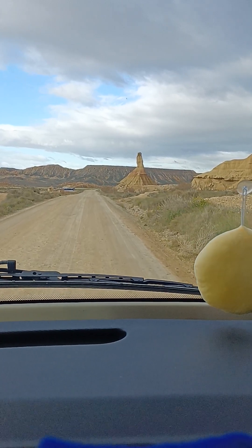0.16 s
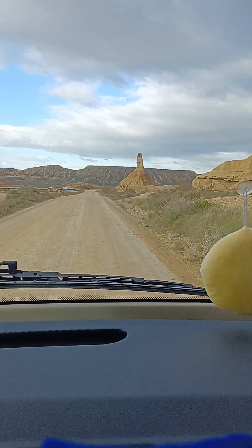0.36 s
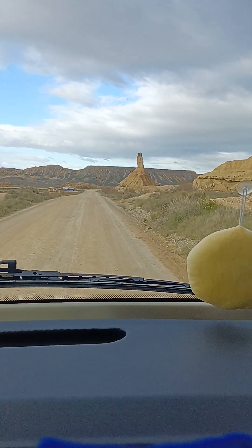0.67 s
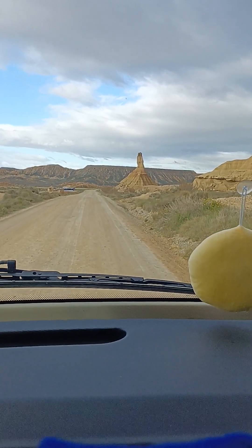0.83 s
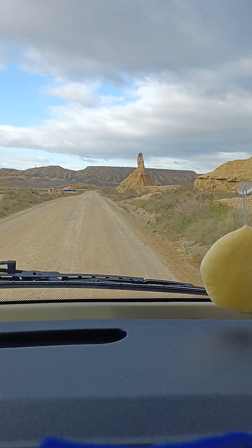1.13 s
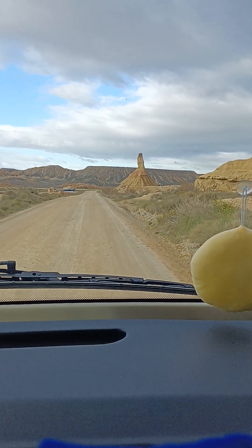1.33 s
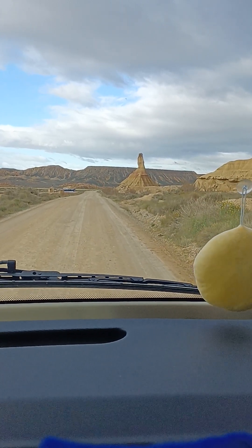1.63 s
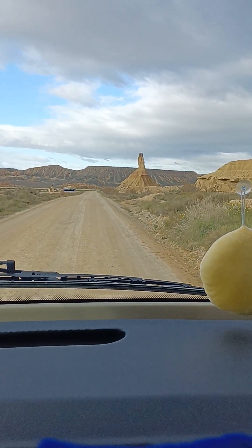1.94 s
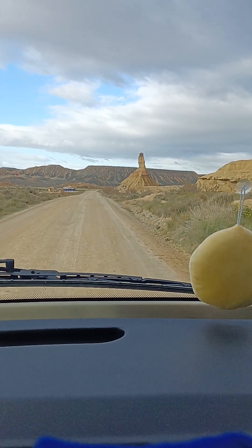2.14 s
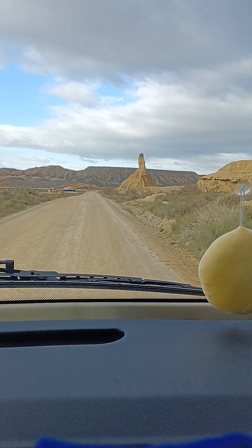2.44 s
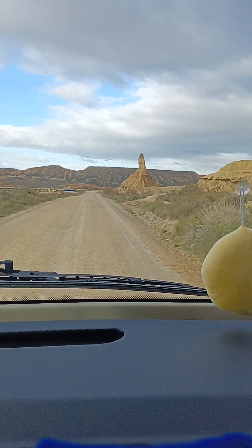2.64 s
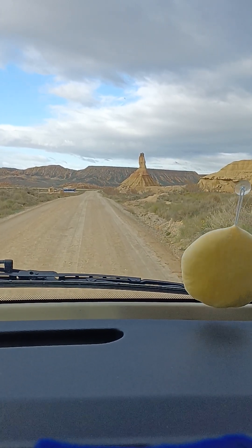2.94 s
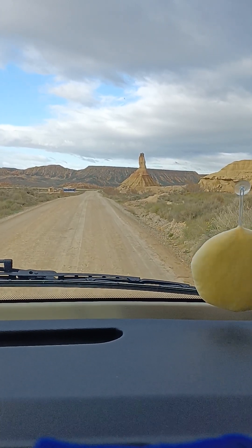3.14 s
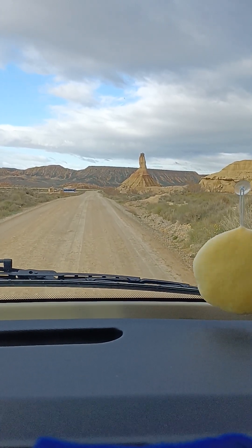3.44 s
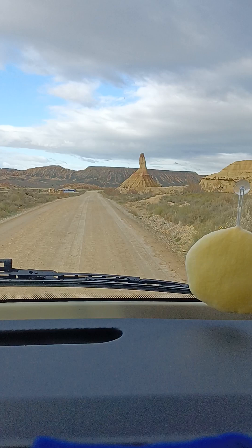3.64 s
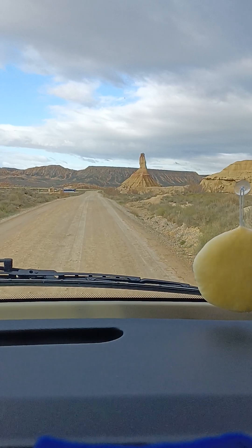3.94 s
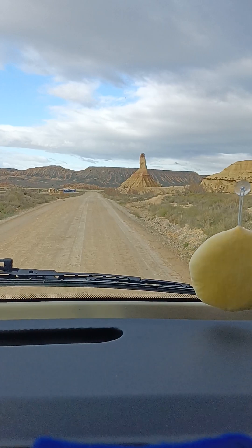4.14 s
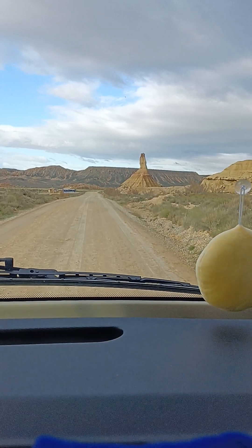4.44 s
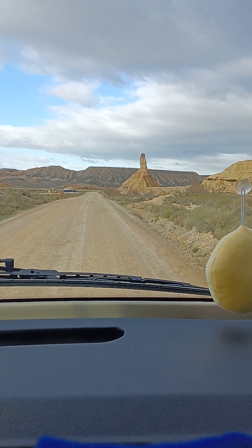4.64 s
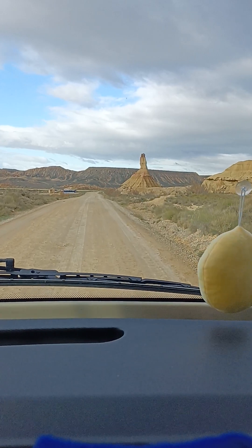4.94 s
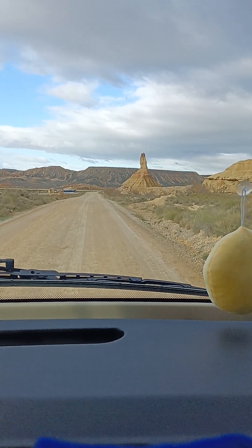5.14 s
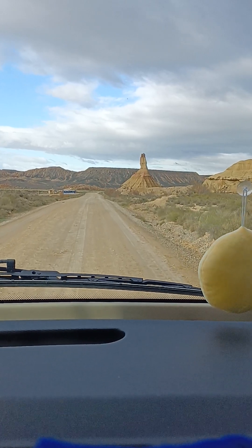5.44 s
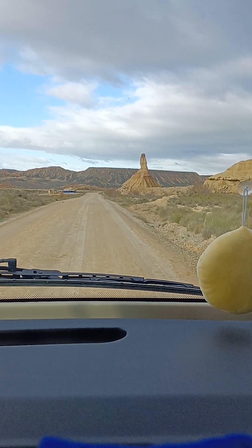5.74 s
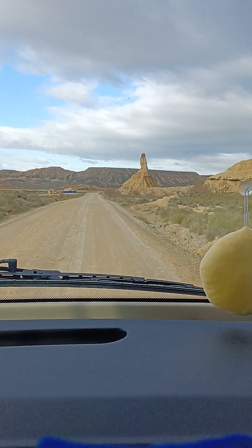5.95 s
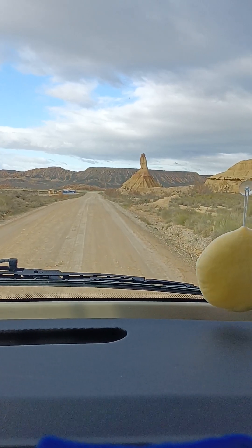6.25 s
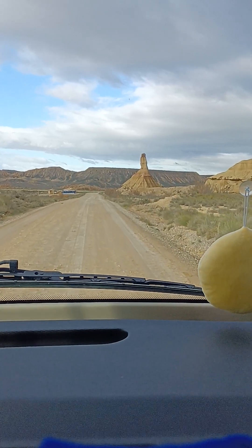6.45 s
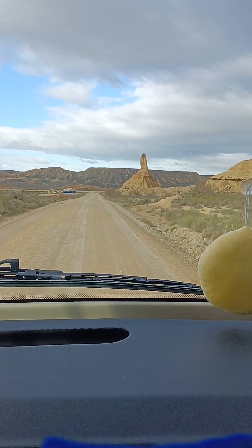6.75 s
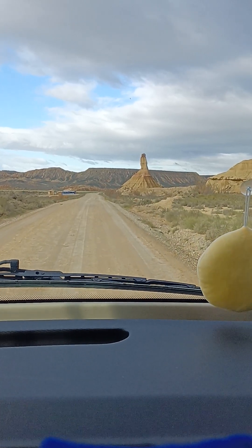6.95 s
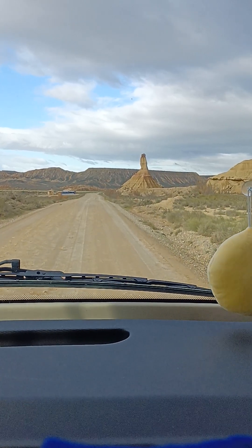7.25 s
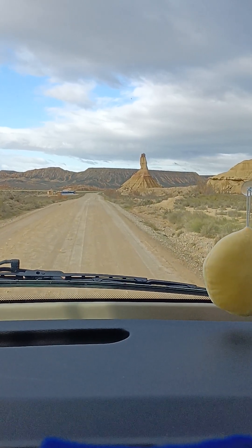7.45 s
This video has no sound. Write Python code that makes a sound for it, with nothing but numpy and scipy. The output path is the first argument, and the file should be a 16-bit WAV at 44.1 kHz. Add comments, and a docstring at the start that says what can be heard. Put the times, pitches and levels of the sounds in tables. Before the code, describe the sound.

Heard from the front seat of a small car on a gravel track. Bumpy low rumble, tyre roar and gritty crunching lie over a humming engine. Stones knock hollowly on the floor and plastic trim clacks and ticks thickly for three seconds; then it thins, with occasional pops and knocks, before roar and engine rise slightly at the end.

```python
"""A small car rolls slowly along a gravel track, heard from the front seat.
From the start, shaped noise makes tyre rumble and roar over crunching resonant stones; harmonics hum as engine.
Knocks, trim clacks and runs of ticks, all modes or noise bursts that die away, crowd the first three seconds.
Pebbles pop as sagging tones and stones skid as narrow noise from the first second on; later the engine note
sinks, the roar eases and two stones strike the wheel arch; at the end roar and engine note rise again."""
import sys
import numpy as np
from scipy import signal
from scipy.fft import rfft, irfft, next_fast_len
from scipy.io import wavfile
from scipy.ndimage import uniform_filter1d

SR = 44100
rng = np.random.default_rng(int(sys.argv[2]) if len(sys.argv) > 2 else 0)


def unload_wav(signal):
    """Save mono or channel-first audio to the path in sys.argv[1] as 16-bit WAV at rate SR, clipped to [-1, 1]."""
    wavfile.write(
        sys.argv[1],
        SR,
        np.round(np.clip(np.atleast_2d(signal).T, -1, 1) * 32767).astype(np.int16),
    )


N = 334719

# spectrum of a stone cracking against the bodywork: frequency_hz, density_db
CRACK_COLOUR = [(400, -0.5), (900, -12.5), (1500, 0.5), (2500, 3.5), (3500, -3), (4500, -15.5), (5500, -12),
                (7500, -30), (8400, -15.5), (9300, -49), (16000, -35)]
# spectrum of the panels and hollows under the car: frequency_hz, density_db
UNDERBODY_COLOUR = [(100, -22), (200, -12), (280, -3), (400, 6), (520, 1), (680, 3.5), (850, -4.5),
                    (1100, -1.5), (1800, -8), (4000, -61)]


def tyres(rumble_db, roar_db):
    """Forced vibration: bumps shake the body; four treads roar, each swelling in its own colour."""
    # spectrum of the shaken body: frequency_hz, density_db
    rumble_colour = [(15, -34), (28, -15), (40, -5.5), (52, 3), (63, -4), (78, 6), (100, 0.5), (122, -12.5),
                     (150, -13), (220, -23), (400, -69)]
    # spectrum of the treads: frequency_hz, density_db
    roar_colour = [(60, -7), (110, 1.5), (160, 4.5), (215, -11), (265, 0), (330, 10.5), (390, 7.5),
                   (460, -9.5), (590, 2.5), (750, -26.5), (1200, -42), (3000, -54)]
    shake = coloured(rng.standard_normal((2, N)), rumble_colour)
    # evened, so that the bumps set its level
    shake = shake / np.sqrt(uniform_filter1d(np.mean(shake ** 2, axis=0), size=2600) + 1e-9)
    treads = np.zeros((2, N))
    for wheel in range(4):
        tread = coloured(rng.standard_normal((2, N)), roar_colour, ripple_db=3, order=110)
        treads += from_db(4.5 * drift(9)) * tread
    rumble = from_db(rumble_db - 3.0 + 2.5 * drift(6.4)) * shake
    return rumble + from_db(roar_db + 4.5) * rms_one(treads)


def body_shake():
    """Power addition: each dip adds a short swell to the steady shaking; level in dB."""
    # steady shaking of the body: time_s, level_db
    steady = [(0, -37.5), (3.08, -37.5), (3.2, -61), (3.5, -35.5), (3.9, -42), (4.15, -43), (4.55, -43.5),
              (4.72, -52), (5.02, -52), (5.15, -42), (6.05, -45), (6.25, -52), (6.72, -64), (6.85, -42.5),
              (7.59, -37.5)]
    # a wheel drops into a dip: middle_s, level_db
    bumps = [(0.165, -31.5), (0.25, -31), (0.408, -30.5), (0.51, -33.5), (0.67, -30.5), (0.87, -31.5),
             (0.99, -34), (1.26, -28.5), (1.44, -39), (1.601, -36), (1.81, -26), (1.978, -38), (2.109, -31),
             (2.501, -29.5), (2.769, -36), (2.94, -40), (3.101, -39), (3.38, -35), (3.54, -42),
             (3.74, -35.0), (4.02, -40), (4.389, -31.5), (4.6, -44), (5.189, -35), (5.35, -35), (5.51, -46),
             (5.71, -37), (5.85, -34.5), (6.089, -38.5), (6.61, -41), (6.97, -36), (7.169, -42),
             (7.28, -41), (7.548, -38)]
    half_width_s = 0.02   # to 1/e of the power
    t = np.arange(N) / SR
    power = from_db(in_time(steady)[0]) ** 2
    for s, db in bumps:
        power = power + from_db(db) ** 2 * np.exp(-np.minimum(((t - s) / half_width_s) ** 2, 20))
    return 10 * np.log10(power)


def surface():
    """Power addition: roar and crunch (dB) rise on loose stones, hold, and decay behind them."""
    # tyres on the packed track: time_s, roar_db, crunch_db
    packed = [(0, -58, -76), (.18, -66, -59.5), (.6, -55.5, -57), (1.1, -49, -54), (2.45, -49.5, -67),
              (2.85, -55, -55.5), (3.08, -57.5, -55.5), (3.6, -55.5, -62), (4.1, -56, -71.5),
              (4.6, -61.5, -72), (5.1, -58.5, -68), (5.5, -57.5, -66), (5.95, -56, -68.5),
              (6.65, -57.5, -69.5), (7.59, -50, -65.5)]
    # the tyres plough through loose stones: start_s, length_s, roar_db, crunch_db
    patches = [(0, 0.041, -41.5, -47.5), (0.263, 0.22, -45.5, -45.5), (0.77, 0.26, -50, -81),
               (1.202, 0.56, -44, -47), (1.846, 0.48, -43, -49), (2.546, 0.23, -43.5, -47),
               (3.32, 0.48, -51.5, -56.5), (4.045, 0.095, -52.5, -84), (4.136, 0.083, -55, -61),
               (4.324, 0.095, -69, -54.5), (4.731, 0.054, -83, -51.5), (5.703, 0.14, -49, -57.5),
               (6.163, 0.089, -51.5, -85), (6.384, 0.099, -60, -51.5), (7.11, 0.08, -46.5, -50),
               (7.466, 0.084, -47, -67)]
    attack_s, release_db_per_s = 0.0077, 221
    t = np.arange(N) / SR
    power = from_db(in_time(packed)) ** 2
    for s, length, *levels_db in patches:
        attack = np.clip((t - s) / attack_s, 0, 1)
        release = from_db(-release_db_per_s * np.clip(t - s - length, 0, 1))
        power = power + np.outer(from_db(levels_db), attack * release) ** 2
    return 10 * np.log10(power)


def gravel(crunch_db, hiss_db):
    """Random impacts: small stones grind together under the treads, over a hiss of grit."""
    # spectrum of the crunch: frequency_hz, density_db
    gravel_colour = [(400, -14), (700, -7), (1000, 6.5), (1500, 7), (2400, 5), (3300, 6.5), (4400, -3.5),
                     (5200, -1), (7000, -7.5), (8000, -29), (9500, -31.5), (16000, -42)]
    grinding = stones(per_s=2200, size_db=4, low_hz=620, high_hz=8000, cycles=40)
    grit = from_db(hiss_db + 4 * drift(24)) * rng.standard_normal((2, N))
    return from_db(crunch_db) * coloured(grinding + grit, gravel_colour)


def underbody(level_db):
    """Overlapping resonances: larger stones tumble under the car in a run of hollow knocks."""
    thinning = 0.27   # they grow scarce on packed ground: extra dB lost per dB of quiet
    knocks = stones(per_s=200, size_db=3, low_hz=380, high_hz=1250, cycles=74)
    thinned_db = level_db - thinning * (level_db.max() - level_db)
    return from_db(thinned_db) * coloured(knocks, UNDERBODY_COLOUR)


def stones(per_s, size_db, low_hz, high_hz, cycles, count=24):
    """Clumped random impacts on two-pole resonators, blurred by the cabin's reverberation; rms 1."""
    blur_t60_s = .05
    born = rng.random(N) < per_s * from_db(4 * drift(25)) / SR   # the drift makes clumps
    spread = from_db(size_db * np.minimum(rng.exponential(1, N), 3))
    sizes = born * spread * rng.standard_normal((2, N))
    dealt = rng.integers(0, count, N)   # which pitch each stone gets
    rings = 0
    for k, hz in enumerate(np.geomspace(low_hz, high_hz, count)):
        r = from_db(-60 * hz / (cycles * SR))   # falls 60 dB in this many cycles
        w = 2 * np.pi * hz / SR
        struck = sizes * (dealt == k) + 1e-18
        rings = rings + signal.lfilter([w, -w], [1, -2 * r * np.cos(w), r * r], struck)
    t = np.arange(SR // 10) / SR
    blur = rng.standard_normal((2, len(t))) * from_db(-60 * t / blur_t60_s)
    return rms_one(signal.fftconvolve(rings, blur, axes=1)[:, :N])


def floor_knocks():
    """Modal ringing: a thrown stone cracks and strikes again; the floor pan rings, its panels shudder."""
    # stones knocking on the floor: time_s, thud_db, crack_db
    knocks = np.array([(0.32, -24.5, -51), (0.359, -34, -39.5), (0.4169, -28, -52), (0.74, -15.5, -37.5),
                       (0.849, -23.5, -46), (1.259, -19.5, -31), (1.332, -32, -59), (1.226, -22.5, -43),
                       (1.47, -41, -37.5), (1.675, -19, -33.5), (2.03, -29, -48), (2.283, -27, -38),
                       (1.874, -16.5, -30), (2.186, -13, -31.5), (2.614, -15.5, -29.5), (2.65, -42, -31),
                       (3.379, -25, -35), (3.46, -26.5, -40.5), (4.384, -53, -44.5), (5.749, -29, -39.5),
                       (6.379, -17, -33.5), (6.44, -28.5, -45), (7.136, -18, -35.5), (7.231, -25, -36.5),
                       (7.511, -30.5, -43)])
    # modes of the floor pan: frequency_hz, level_db, t60_s
    floor_modes = [(344.4, -4, 0.11), (363.3, -16, 0.18), (411, -8.5, 0.11), (567, -22.5, 0.036),
                   (619, -19, 0.093), (665, -23, 0.024), (803, -21.5, 0.21), (960, -9.5, 0.018)]
    early_s, bounce_s, thud_db = .003, .011, -4.5
    shudder_db, shudder_t60_s = -20, 0.1
    t = np.arange(SR // 4) / SR
    thuds, shudder = np.zeros(N), np.zeros(N)
    for s, db, _ in knocks:
        for late_s in (-early_s, bounce_s):
            ring = np.zeros(len(t))
            for hz, mode_db, t60 in floor_modes:
                strength_db, detune, turn = rng.standard_normal(3)
                wave = np.sin(2 * np.pi * (hz * (1 + 0.0345 * detune) * t + turn))
                ring += from_db(mode_db + strength_db - 60 * t / t60) * wave
            add(thuds, s + late_s, from_db(db + thud_db) * ring * (1 - np.exp(-t / 0.0015)))
        fall_db = 60 * np.maximum(t - bounce_s, 0) / shudder_t60_s
        envelope = from_db(db + shudder_db - fall_db) * (1 - np.exp(-t / 0.0017))
        add(shudder, s - early_s, envelope)
    cracks = strikes(knocks[:, [0, 2]], CRACK_COLOUR, body_t60=0.055, tail_t60=0.11, tail_db=1.0,
                     lead_s=0.0093, lead_db=2.5, rebound_s=0.024, rebound_db=-2.5, late_s=0)
    panels = shudder * coloured(rng.standard_normal((2, N)), UNDERBODY_COLOUR)
    return thuds * panned(2.8) + panels + from_db(3.5) * cracks


def rattles():
    """Impact excitation: ticks, clacks with a ringing panel, stones on the wheel arch, a faint tinkle."""
    # loose fittings tick, mostly in runs about 50 ms apart: time_s, level_db, brightness_db
    tick_events = [(.0412, -35.5, 2.5), (.0805, -40, 1.5), (.2634, -37, 0.5), (.3212, -31.5, 5),
                   (.4196, -27, 2.5), (.4692, -37, 2), (.5831, -41.5, 7), (.6787, -46, 0),
                   (.7158, -34, -8.5), (.845, -37, -0.5), (1.068, -42.5, -5), (1.2229, -29.5, 3),
                   (1.3182, -32, 1), (1.3758, -32, -2), (1.4234, -37.5, -8), (1.5198, -32.5, -0.5),
                   (1.5725, -33.5, -2), (1.623, -36, 3), (1.6747, -31, 4.5), (1.7242, -33, 1),
                   (1.8483, -41.5, 13), (1.8961, -37, -8), (2.091, -44, 0), (2.148, -31.5, 1),
                   (2.2033, -26.5, -1.5), (2.2481, -26, 4), (2.3392, -36.5, 0), (2.3841, -44, -1),
                   (2.429, -34.5, -2.5), (2.5664, -26.5, 0.5), (2.7111, -36, 0), (2.7728, -32, 2),
                   (2.9808, -37, 1), (3.025, -31.5, 2), (3.072, -32, 1.5), (3.1287, -41.5, -2),
                   (3.1938, -32, 0), (3.3173, -45, 4), (3.3824, -33.5, 3.5), (3.5929, -33, 1.5),
                   (3.6838, -29, -0.5), (3.731, -30.5, 1), (3.8983, -51, 2), (3.9512, -32, 1),
                   (4.0044, -33, -0.5), (4.1675, -32.5, 3.5), (4.2162, -32.5, 1), (4.2654, -37.5, 2),
                   (4.393, -42, -3), (4.5005, -47, -5), (4.5547, -47.5, -0.5), (4.7366, -40, -8),
                   (5.0614, -52, 9), (5.2358, -45, 2.5), (5.2851, -36.5, 0), (5.4345, -36, 3.5),
                   (5.5223, -44, 1), (5.5732, -40.5, 0.5), (5.6258, -41.5, 1), (5.7622, -33, 2),
                   (5.8111, -33, 1.5), (5.867, -37, 1.5), (6.0872, -39, 2.5), (6.1452, -47, 2),
                   (6.2012, -43, 9), (6.7122, -40.5, 1), (6.7599, -39, -3), (6.807, -38.5, -1.5),
                   (7.031, -52, 9), (7.0833, -44.5, -0.5), (7.139, -32, -1.5), (7.4567, -39.5, 0),
                   (7.5156, -34.5, -3)]
    # spectrum of a tick: frequency_hz, density_db
    tick_colour = [(400, -12), (1000, -18.5), (1800, -16), (2300, -2), (3300, -0.5), (4500, -8),
                   (5000, -1.5), (6000, -9.5), (7200, -7.5), (7900, -21.5), (8600, -17.5), (9500, -31),
                   (12000, -23), (16000, -35.5)]
    # plastic trim clacks: time_s, level_db
    clack_events = [(0.0034, -30), (0.316, -31), (0.624, -34.5), (0.7139, -22.5), (0.8404, -30),
                    (1.0675, -37.5), (1.2189, -24.5), (1.258, -20.5), (1.4672, -23.5), (1.6216, -29.5),
                    (1.9637, -25.5), (2.0302, -20.5), (2.2453, -21.5), (2.2824, -27), (2.7101, -25.5),
                    (4.006, -29), (4.333, -34), (5.7463, -27), (6.1434, -27), (6.545, -22.5), (7.1786, -31),
                    (7.4966, -22.5)]
    # spectrum of a clack: frequency_hz, density_db
    clack_colour = [(400, -5.5), (1050, -31.5), (1400, -4.5), (1850, -5), (2200, 9.5), (2800, 2),
                    (3500, -3), (4400, -14), (5200, -17), (6500, -22.5), (8300, -27.5), (9300, -51),
                    (16000, -39)]
    # modes of the dashboard panel behind the clacks: frequency_hz, level_db, t60_s
    panel_modes = [(1330, -8, 0.07), (1490, -17.5, 0.045), (1910, -15.5, 0.17), (2120, 1.5, 0.039),
                   (2350, -9, 0.015), (2573, -13, 0.079), (2720, -7.5, 0.078), (3150, -13, 0.058)]
    # stones striking the left wheel arch: time_s, level_db
    arch_hits = [(4.7372, -34.5), (5.3678, -34)]
    # a small piece of metal tinkles when shaken: time_s, level_db
    tinkle_events = [(.3601, -49), (1.4222, -44), (2.1844, -47), (2.6145, -40)]
    # modes of the metal: frequency_hz, level_db, t60_s
    tinkle_modes = [(8280, -2.5, 0.058), (8100, -6, 0.053)]
    ticks = strikes(tick_events, tick_colour, body_t60=0.019, tail_t60=0.14, tail_db=-6.0,
                    lead_s=.007, lead_db=7.5, rebound_s=0.0034, rebound_db=-8.5, late_s=0)
    clacks = strikes(clack_events, clack_colour, body_t60=0.011, tail_t60=0.11, tail_db=-9.0,
                     lead_s=0.0083, lead_db=6.5, rebound_s=.008, rebound_db=-1.5, late_s=0.000965)
    arch = strikes(arch_hits, CRACK_COLOUR, body_t60=0.055, tail_t60=0.22, tail_db=-11.5,
                   lead_s=0.0027, lead_db=3.0, rebound_s=0.007, rebound_db=-31.0, late_s=0)
    panel = ringing(clack_events, panel_modes, rise_s=0.00097, spread_db=-2.0)
    tinkle = ringing(tinkle_events, tinkle_modes, rise_s=0.002, spread_db=3)
    trim = from_db(-3.5) * clacks + from_db(-2) * panel * panned(2.7)
    return from_db(1) * with_echo(ticks) + trim + arch * panned(5.4) + from_db(4.5) * tinkle


def strikes(events, colour, body_t60, tail_t60, tail_db, lead_s, lead_db, rebound_s, rebound_db,
            late_s, size=7200):
    """Convolution of contacts with a response: blows share a ring, but each favours other modes."""
    out = np.zeros((2, N))
    shared = rng.standard_normal((2, size))
    hz, colour_db = np.transpose(colour)
    treble = np.clip(np.log2(hz / 4700), -.4, 1)   # a third event column tilts the blow brighter
    for s, db, *brightness_db in events:
        own_colour = np.c_[hz, colour_db + sum(brightness_db) * treble]
        ring = coloured(shared + rng.standard_normal((2, size)), own_colour, ripple_db=1.8)
        touches = contacts(lead_s, lead_db, rebound_s, rebound_db)
        sound = signal.fftconvolve(response(ring, body_t60, tail_t60, tail_db), touches[None])
        peak = np.sqrt(uniform_filter1d(np.mean(sound ** 2, axis=0), size=180).max())
        # the hard contact falls late_s after the listed time
        add(out, s + late_s - lead_s, from_db(db) * sound / peak)
    return out


def contacts(lead_s, lead_db, rebound_s, rebound_db, size=2400):
    """Impulsive excitation: a short soft swell of noise, a hard contact, gritty spray and rebounds."""
    spray_db, spray_t60_s = -2.5, 0.024   # level against the hard contact
    n = np.arange(size)
    main = min(round(lead_s * SR) + 2, size // 2)
    swell = dulled(rng.standard_normal(size) * (n < main) * (n / main) ** 2, hz=12100)
    out = from_db(lead_db) * swell / np.linalg.norm(swell) / 2
    out[main] += 1
    # cubed noise is spiky
    spray = (rng.standard_normal(size) ** 3 * from_db(-60 * n / SR / spray_t60_s))[:size - main]
    out[main:] += from_db(spray_db) * spray / np.linalg.norm(spray)
    for delay, strength in rng.random((4, 2)):
        place = min(main + round(delay * rebound_s * SR), size - 1)
        out[place] += from_db(rebound_db) * (2 * strength - 1)
    return out


def response(ring, body_t60, tail_t60, tail_db):
    """Modal decay and reverberation: crowded modes die fast; reflections linger, dulled by the seats."""
    # left minus right: blows come from ahead, reflections from the left window
    body_pan_db, tail_pan_db = -3, 6
    t = np.arange(ring.shape[1]) / SR
    tail = ring * from_db(tail_db - 60 * t / tail_t60) * (1 - np.exp(-t / 0.0075))
    body = ring * from_db(-60 * t / body_t60) * (1 - np.exp(-t / 0.00047))
    return body * panned(body_pan_db) + dulled(tail, hz=7040) * panned(tail_pan_db)


def ringing(events, modes, rise_s, spread_db, size=8000):
    """Modal synthesis: blows ring the same modes in new strengths; each ear has its own phase."""
    out = np.zeros((2, N))
    t = np.arange(size) / SR
    for s, db in events:
        ring = np.zeros((2, size))
        for hz, mode_db, t60 in modes:
            strength_db = mode_db + spread_db * rng.standard_normal()
            ear_phase = rng.standard_normal((2, 1))
            wave = np.sin(2 * np.pi * (hz * t + rng.random()) + ear_phase)
            ring += from_db(strength_db - 60 * t / t60) * wave
        add(out, s, from_db(db) * ring * (1 - np.exp(-t / rise_s)))
    return out


def with_echo(x):
    """Specular reflection: the far end of the cabin returns the sound with its sides exchanged."""
    delay_s, echo_db = 0.013, -12.5
    lag = round(delay_s * SR)
    return x + from_db(echo_db) * np.pad(x[::-1], ((0, 0), (lag, 0)))[:, :N]


def pebble_pops():
    """Damped oscillation: a squeezed pebble's hollow note sags in pitch and lingers in the cabin."""
    # pebbles popping from under a tread: start_s, level_db, pitch_hz
    pop_events = [(0.893, -42, 1577), (0.946, -44, 1246), (2.113, -42, 1750), (2.5013, -41.5, 1624),
                  (3.2722, -35, 1547), (3.5392, -30, 1697), (4.316, -34, 1473), (7.11, -45, 1312)]
    pop_db, rise_s, t60_s, sag_hz_per_s = 3.5, 0.0024, 0.038, 7300
    tail_db, tail_t60_s = 7.5, 0.11
    out = np.zeros((2, N))
    t = np.arange(SR // 5) / SR
    for s, db, hz in pop_events:
        sagging_hz = hz - sag_hz_per_s * np.minimum(t, t60_s)
        wave = np.sin(2 * np.pi * np.cumsum(sagging_hz) / SR)
        note = wave * np.minimum(t / rise_s, 1) * from_db(-60 * t / t60_s)
        room = rng.standard_normal((2, len(t))) * from_db(-60 * t / tail_t60_s)
        room *= from_db(tail_db) / np.linalg.norm(room[0])
        room[:, 0] += 1   # direct sound
        sound = signal.fftconvolve(room, note[None])
        add(out, s, from_db(db + pop_db) * sound / np.abs(sound).max())
    return out * panned(3)


def scuffs():
    """Friction noise: a skidding stone rasps briefly in a narrow, grainy band."""
    # a stone skids under a tread: start_s, length_s, level_db, pitch_hz
    skids = [(0.776, 0.092, -53, 980), (0.931, 0.047, -53, 1410), (2.802, 0.053, -53, 590),
             (3.955, 0.066, -51.5, 1040), (4.182, 0.042, -50.5, 1218), (4.398, 0.014, -52, 1800),
             (4.609, 0.036, -62, 1570), (4.624, .012, -56.5, 3150), (6.137, .02, -45.5, 1330),
             (6.188, 0.036, -49, 1320), (6.472, 0.018, -41, 1402), (6.893, 0.058, -65, 1720),
             (7.463, 0.027, -47.5, 1405)]
    pass_width_hz = 294   # of each of the two filter passes
    grain_db, rise_s, release_db_per_s = 1.5, 0.0018, 458
    out = np.zeros((2, N))
    t = np.arange(SR // 5) / SR
    for s, length, db, hz in skids:
        peak_filter = signal.iirpeak(hz, hz / pass_width_hz, fs=SR)
        band = signal.lfilter(*peak_filter, rng.standard_normal((2, len(t))))
        band = rms_one(signal.lfilter(*peak_filter, band))
        release_db = release_db_per_s * np.maximum(t - length, 0)
        level_db = db + grain_db * drift(90)[:len(t)] - release_db
        add(out, s, from_db(level_db) * np.minimum(t / rise_s, 1) * band)
    return out * panned(7.6)


def tyre_drone():
    """Cavity resonance: the air in the tyres rings in swells, a fluttering note with a weak octave."""
    # swells of the tyre air: middle_s, length_s, level_db, pitch_hz
    drones = [(0.108, 0.31, -40, 318.5), (0.692, 0.13, -39, 325.4), (0.938, 0.059, -40, 325),
              (1.119, 0.12, -41, 335.5), (2.041, 0.15, -41, 344.6), (3.407, 0.2, -36.5, 341.6),
              (3.684, 0.093, -43, 335), (3.887, 0.17, -41, 315), (4.033, 0.075, -44.5, 329.4),
              (4.215, 0.27, -48, 315), (4.392, 0.14, -43.5, 304.6), (4.676, 0.13, -42, 300),
              (4.817, 0.07, -42.5, 295), (4.93, 0.055, -34.5, 322), (5.093, 0.11, -41.5, 297),
              (5.364, 0.1, -53, 289.2), (5.621, 0.18, -42, 301.3), (5.919, .17, -52, 303.5),
              (6.33, 0.093, -41.5, 310), (6.524, 0.2, -44.5, 305.5), (6.752, 0.096, -41.5, 320),
              (6.92, 0.33, -49.5, 300.5), (7.082, 0.088, -43.5, 303.2), (7.448, 0.24, -45.5, 316)]
    t = np.arange(N) / SR
    sway = 1 + .05 * drift(22)
    power = np.zeros(N)
    for s, length, db, hz in drones:
        power += from_db(db) ** 2 * np.exp(-np.minimum(((t - s) / (length / 2)) ** 2, 30))
    pitch, = in_time(np.array(drones)[:, [0, 3]])
    phase = 2 * np.pi * np.cumsum(pitch * sway) / SR
    note = 0
    for k, db, flutter_db in ((1, 0, 3.5), (2, -20, 4.5)):
        note = note + from_db(db + flutter_db * drift(29)) * np.sin(k * phase) * panned(4.0 * k)
    return from_db(-0.5) * np.sqrt(power) * note


def engine(firing_hz, second_db, third_db):
    """Harmonic series: low firing harmonics boom through the bulkhead, swaying as the engine rocks."""
    # weaker harmonics: multiple_of_firing_rate, level_against_3rd_db
    overtones = [(1, -72), (4, -12), (5, -26.5), (6, -24.5), (7, -22.5)]
    eighth_db = -54   # set apart from the load
    ear_phase = 0.12 * np.array([[1], [-1]])   # radians by which each ear leads or lags
    phase = 2 * np.pi * np.cumsum(firing_hz * (1 + .009 * drift(14))) / SR
    levels = [(2, second_db), (3, third_db), (8, eighth_db)]
    levels += [(round(k), third_db + db) for k, db in overtones]
    hum = np.zeros((2, N))
    for k, db in levels:
        wave = np.sin(k * phase + rng.uniform(0, 2 * np.pi) + ear_phase)
        hum += from_db(db + 2.8 * drift(14)) * wave
    return np.sqrt(2) * hum


def whine(firing_hz):
    """Narrow-band noise: a faint, breathy whine follows the engine's pitch, coming and going."""
    # whine: time_s, level_db
    whine_level = [(0, -63), (3.8, -68), (4.1, -77), (4.4, -65), (4.68, -73.5), (5.15, -70), (5.5, -61.5),
                   (6.6, -65.5), (7.59, -58)]
    level_db = in_time(whine_level)[0] + 2.5 * drift(4) + 3 * drift(25)
    breath = np.array([wavering_tone(90 * firing_hz, width_hz=170) for ear in range(2)])
    return from_db(level_db) * breath * panned(9)


def wavering_tone(hz, width_hz):
    """Quadrature modulation: two slow noises on a carrier make a narrow band that follows a pitch."""
    phase = 2 * np.pi * np.cumsum(hz) / SR
    return drift(width_hz) * np.cos(phase) + drift(width_hz) * np.sin(phase)


def coloured(pair, colour, ripple_db=0, order=40):
    """Spectral shaping and interaural coherence: spectrum, random ripple, cabin stereo image; rms 1."""
    # both ears: frequency_hz, left_right_likeness, left_minus_right_db
    stereo = [(60, .975, -.2), (130, .92, .5), (250, .9, 3), (400, .92, 2.5), (630, .7, 4.6), (800, .44, 7),
              (1050, .05, 4.5), (1600, .07, 4), (2050, .4, 3), (2540, .2, .8), (3200, -.1, 5),
              (4100, -.2, 4), (5100, .1, 0), (6400, -.2, 6), (8000, .2, 2.5), (14000, 0, 2.5)]
    size = next_fast_len(pair.shape[1])
    hz = np.arange(size // 2 + 1) * SR / size
    alike, pan_db = at_hz(stereo, hz)
    alike = np.clip(alike, -1, 1)
    spectrum_db = at_hz(colour, hz)[0] + ripple_db * unevenness(hz, order)
    mid, side = rfft(pair, size) * from_db(spectrum_db)
    sign = np.array([[1], [-1]])   # left, right
    both = np.sqrt(1 + alike) * mid + sign * np.sqrt(1 - alike) * side
    both = both * from_db(sign * pan_db / 2)
    return rms_one(irfft(both, size)[:, :pair.shape[1]])


def unevenness(hz, order):
    """Random frequency response: a ripple through points on a log-frequency axis, spread about 1."""
    points = np.linspace(np.log(200), np.log(16000), order)
    return np.interp(np.log(hz + 1), points, rng.standard_normal(order))


def dulled(x, hz):
    """Low-pass filtering: two equal real poles gently absorb the treble."""
    r = np.exp(-2 * np.pi * hz / SR)
    return signal.lfilter([(1 - r) ** 2], [1, -2 * r, r * r], x + 1e-18)


def drift(rate):
    """Low-passed noise: a smooth random curve of spread 1, with two poles at the rate in Hz."""
    step, settle = 20, 2000   # samples between points; points dropped while the filter settles
    r = np.exp(-2 * np.pi * rate * step / SR)
    noise = rng.standard_normal(N // step + settle + 2)
    slow = signal.lfilter([1], [1, -2 * r, r * r], noise)[settle:]
    return np.interp(np.arange(N) / step, np.arange(len(slow)), rms_one(slow))


def panned(db):
    """Interaural level difference: left and right gains."""
    return from_db(np.array([[1], [-1]]) * db / 2)


def add(out, s, sound):
    """Superposition: mix a sound in at a time in seconds."""
    start = int(np.clip(round(s * SR), 0, N - 1))
    out[..., start:start + sound.shape[-1]] += sound[..., :N - start]


def in_time(rows):
    """Linear interpolation in time: one curve per column, a value for every sample."""
    s, *columns = np.transpose(rows)
    return [np.interp(np.arange(N) / SR, s, c) for c in columns]


def at_hz(rows, hz):
    """Linear interpolation on a log-frequency axis: one curve per column."""
    points, *columns = np.transpose(rows)
    return [np.interp(np.log(hz + 1), np.log(points), c) for c in columns]


def from_db(db):
    """Level to amplitude: 20 dB for each factor of ten."""
    return 10 ** (np.asarray(db) / 20)


def rms_one(x):
    """Normalization to unit mean power."""
    return x / np.sqrt(np.mean(x ** 2) + 1e-20)


def scene():
    """Superposition of tyres, gravel, rattles and engine; the cabin boom lifts the 2nd harmonic."""
    # engine: time_s, firing_rate_hz, third_harmonic_db
    engine_course = [(0, 39.26, -42), (.45, 40.79, -37), (2.45, 43.86, -38), (2.87, 40.92, -39.5),
                     (3.1, 41.8, -41), (3.3, 41.6, -37), (3.5, 40.4, -36.5), (3.95, 37.97, -46),
                     (4.1, 37.7, -39.5), (4.35, 37.04, -42), (4.6, 38.1, -54), (4.9, 38.1, -55),
                     (5.15, 36.56, -55.5), (5.7, 37.6, -43), (6.0, 36.65, -52.5), (6.35, 37.4, -44),
                     (6.55, 37.3, -43.5), (6.7, 37.34, -54.5), (6.9, 37.6, -44), (7.59, 39.1, -42)]
    second_below_db, boom_hz, boom_width_hz, boom_rise_db = -10, 88.9, 2.3, 24
    roar_db, crunch_db = surface()
    rolling = tyres(body_shake(), roar_db) + underbody((roar_db + crunch_db) / 2)
    crunch = gravel(crunch_db + 5, hiss_db=-2.5) * panned(2.5)
    blows = floor_knocks() + rattles() + pebble_pops()
    firing_hz, third_db = in_time(engine_course)
    boom_db = boom_rise_db / (1 + ((2 * firing_hz - boom_hz) / boom_width_hz) ** 2)
    second_db = third_db + second_below_db + boom_db
    motor = from_db(-2.5) * engine(firing_hz, second_db, third_db) * panned(.8)
    return rolling + crunch + blows + scuffs() + tyre_drone() + motor + whine(firing_hz)


def record(dry):
    """Band limiting: the small microphone loses the deepest bass; the top is cut steeply."""
    bass_cut = signal.butter(5, 34, "high", fs=SR, output="sos")
    treble_cut = signal.ellip(10, .2, 90, 15900, fs=SR, output="sos")
    return signal.sosfilt(treble_cut, signal.sosfilt(bass_cut, dry))


dry = scene()
out = record(dry)
unload_wav(out)
```